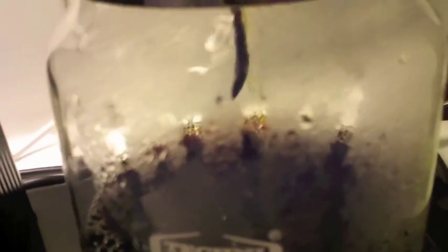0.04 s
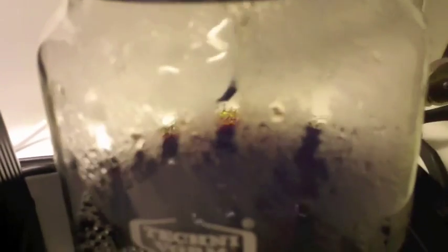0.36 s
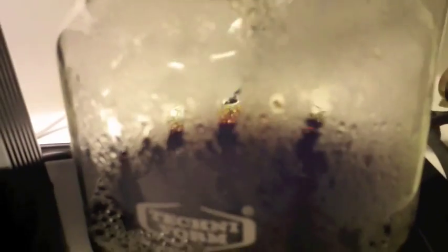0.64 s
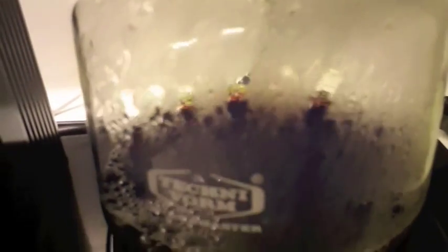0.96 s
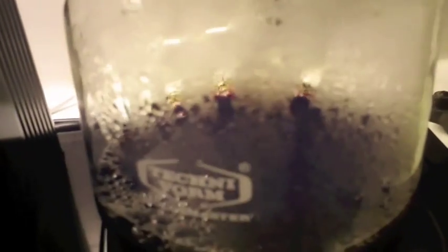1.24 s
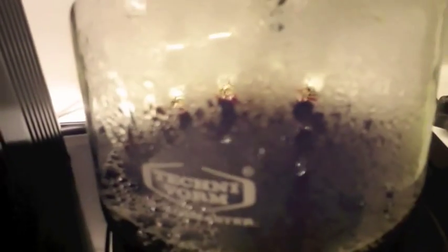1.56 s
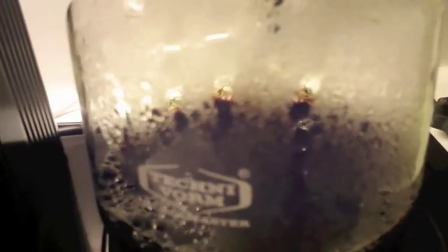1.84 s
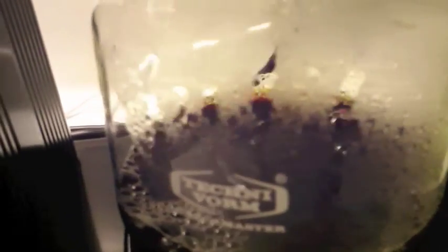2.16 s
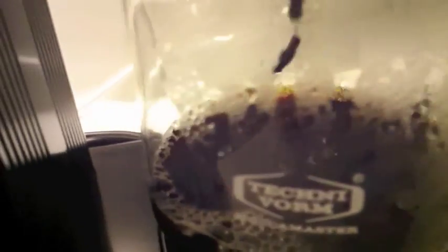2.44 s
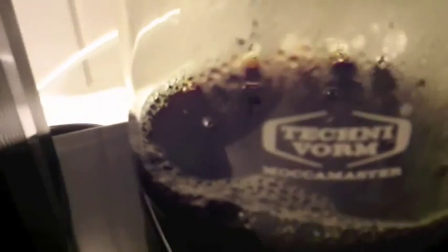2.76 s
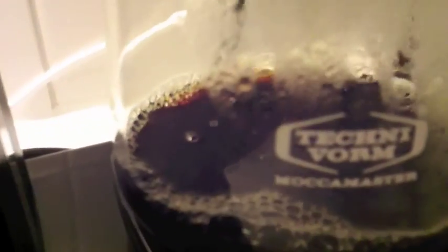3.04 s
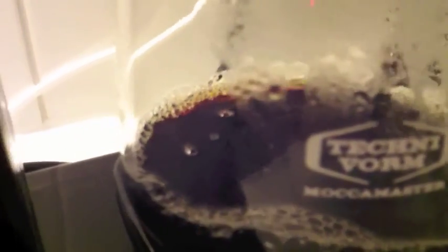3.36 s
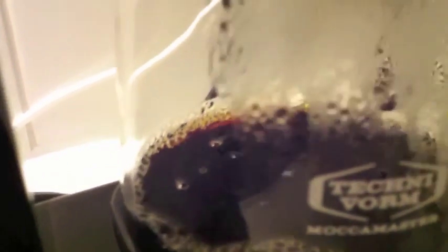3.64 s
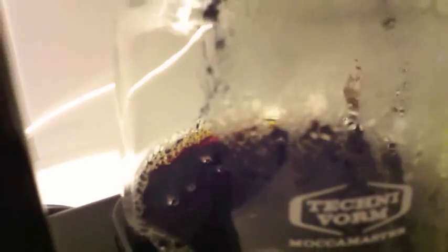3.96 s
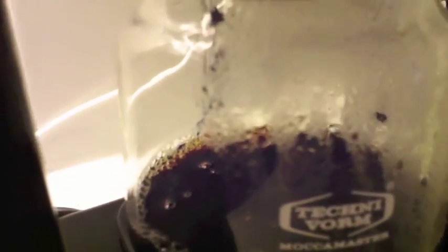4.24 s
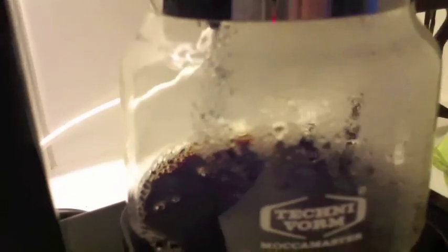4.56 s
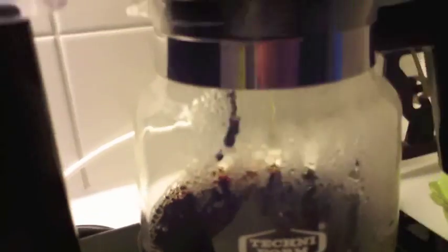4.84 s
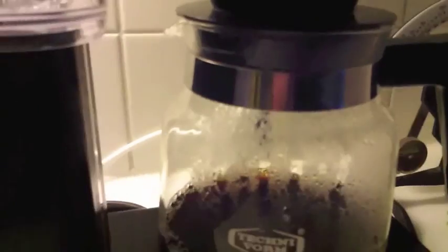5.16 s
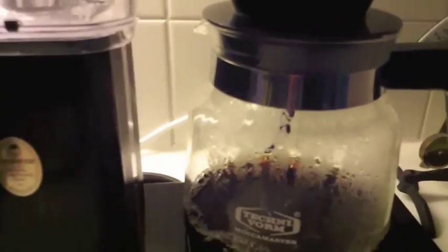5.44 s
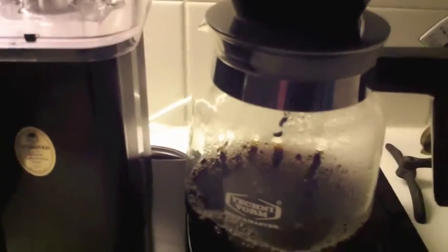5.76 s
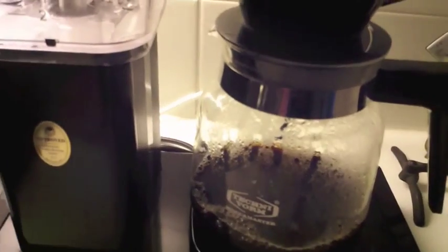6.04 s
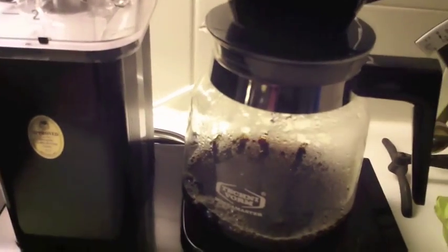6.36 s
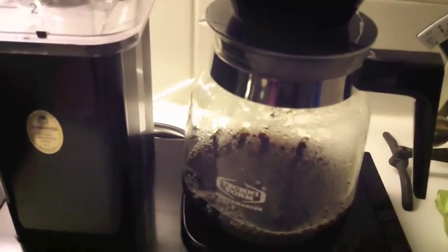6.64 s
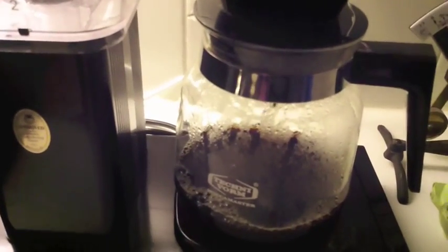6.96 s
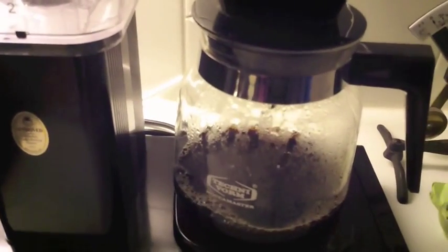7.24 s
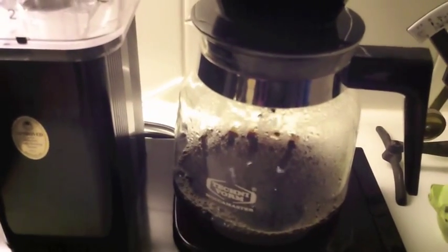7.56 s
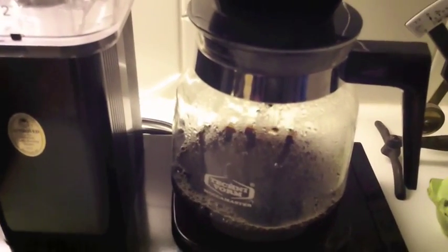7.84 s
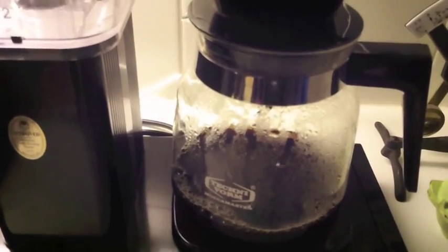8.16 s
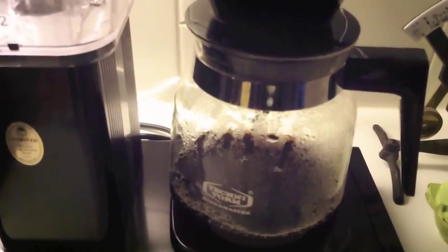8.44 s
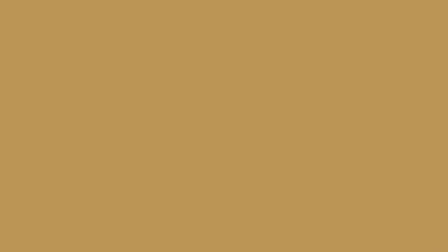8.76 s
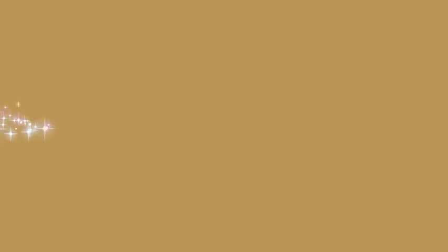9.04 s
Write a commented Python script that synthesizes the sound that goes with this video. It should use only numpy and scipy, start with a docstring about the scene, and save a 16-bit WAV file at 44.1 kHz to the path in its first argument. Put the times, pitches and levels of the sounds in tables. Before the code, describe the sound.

Coffee trickles into a half-full glass carafe in a quiet kitchen, with irregular hollow plinks and small wet ticks on the glass. The loudest drops fall near the middle, and a few low glugs come toward the end. Underneath, the hot plate sizzles faintly with tiny snaps, over soft hiss and mains hum. The close, hand-held microphone picks up low rumble, soft bumps and a few dry clicks.

```python
"""In a kitchen, coffee trickles from a filter into a half-full glass carafe, close to a hand-held mic. Each
drop traps a short-lived bubble that rings the air in the carafe. Spatter ticks on the glass, and later on big
bubbles glug. Wet spots sizzle and snap on the hot plate, over soft air noise, a few steady breathy notes and a
faint mains hum. The hand rumbles and bumps on the microphone, and a few dry clicks sound right beside it."""
import sys
import numpy as np
from scipy import signal
from scipy.fft import rfft, irfft, next_fast_len
from scipy.io import wavfile

SR = 44100
rng = np.random.default_rng(int(sys.argv[2]) if len(sys.argv) > 2 else 0)


def to_wav(sig):
    """Store sig (one row per channel, or 1-D mono) as 16-bit WAV at the path in sys.argv[1].

    Samples outside -1..1 are clipped; the rate is SR.
    """
    pcm = np.clip(np.atleast_2d(sig), -1, 1) * 32767
    pcm = np.round(pcm).astype(np.int16)
    wavfile.write(sys.argv[1], SR, pcm.T)  # frames by channels


N = 410571
TIME = np.arange(N) / SR
END_S = 8.605


def from_db(db):
    """Turn decibels into a number to multiply by."""
    return 10 ** (np.asarray(db) / 20)


def rms_one(x):
    """Scale a sound so that its average strength (rms) is 1."""
    return x / np.sqrt(np.mean(x ** 2) + 1e-20)


def in_time(rows):
    """Join a table's timed points with straight lines: one curve for each value column."""
    times, *columns = np.transpose(rows)
    return [np.interp(TIME, times, column) for column in columns]


def at_hz(points, hz):
    """Look up values between a table's frequencies, with octaves evenly spaced."""
    f, value = np.transpose(points)
    return np.interp(np.log(hz + 1), np.log(f), value)


def pan(left_db):
    """Left and right gains that make the left side louder by left_db."""
    return from_db(np.array([[left_db], [-left_db]]) / 2)


def add(out, s, sound):
    """Mix a sound in, starting at s seconds."""
    i = max(round(s * SR), 0)
    out[:, i:i + sound.shape[-1]] += sound[..., :N - i]


def resonate(x, hz, q):
    """Keep the sound near one pitch; a higher sharpness q rings longer."""
    w = 2 * np.pi * min(hz, SR * .45) / SR
    a = np.sin(w) / (2 * q)
    return signal.lfilter([a, 0, -a], [1 + a, -2 * np.cos(w), 1 - a], x)


def resonate_twice(x, hz, q):
    """Two passes shut out the other pitches more firmly."""
    return resonate(resonate(x, hz, q), hz, q)


def keep_side(x, side, hz):
    """Keep only the "low" or the "high" side of a frequency."""
    return signal.sosfilt(signal.butter(4, hz, side, fs=SR, output="sos"), x)


def coloured(spectrum, shape):
    """Noise with the balance of bass and treble that a table gives."""
    size = next_fast_len(shape[-1])
    gain = from_db(at_hz(spectrum, np.arange(size // 2 + 1) * SR / size))
    white = rfft(rng.standard_normal(shape), size)
    return rms_one(irfft(white * gain, size)[..., :shape[-1]])


def drift(per_s):
    """A slow wobble that heads for a new random value per_s times a second."""
    return np.interp(TIME * per_s, np.arange(400), rng.standard_normal(400))


# tone of the kitchen air: f/Hz, level/dB (table levels are relative; the code sets the final loudness)
AIR_TONE = [(35, -29), (60, 3.5), (210, -4.5), (327, -11.5), (486, -12), (546, -14), (1170, -17),
            (1630, -31), (1740, -25), (2710, -24), (3670, -25.5), (4030, -26.5), (8870, -24.5),
            (14100, -27.5), (15500, -32)]
# how alike left and right are: f/Hz, likeness (1 the same, -1 opposite)
AIR_LIKENESS = [(60, -1.1), (200, -0.17), (500, 0.068), (1200, 0.56), (4000, 0.44), (15000, 0.054)]
def kitchen_air():
    """The room's steady hush, partly shared by the two sides."""
    size = next_fast_len(N)
    alike = np.clip(at_hz(AIR_LIKENESS, np.arange(size // 2 + 1) * SR / size), -1, 1)
    mid, side = rfft(coloured(AIR_TONE, (2, N)), size)
    spectrum = np.sqrt(1 + alike) * mid + np.sqrt(1 - alike) * side * [[1], [-1]]
    return from_db(-58.49) * irfft(spectrum, size)[:, :N]


# notes that ring steadily, the two lowest from the air in the carafe: f/Hz, width/Hz, level/dB
STEADY_NOTES = [(246, 15, -85.5), (491.2, 6.7, -71), (778, 20, -70.5), (1840, 21.5, -82.5), (3100, 41, -76),
                (3738, 68, -69.5), (4530, 33, -82)]
def steady_notes():
    """A few breathy notes keep softly ringing; the two lowest are the air in the carafe humming."""
    white = rng.standard_normal(N) + 0.66 * rng.standard_normal((2, N))
    notes = sum(from_db(db) * rms_one(resonate(white, hz, hz / width)) for hz, width, db in STEADY_NOTES)
    return from_db(-2.5) * notes


# tones of the mains power: f/Hz, level/dB
HUM_TONES = [(100, -66.5), (200, -72.5)]
def mains_hum():
    """The electricity supply hums with two low, pure tones."""
    return sum(from_db(db) * np.sqrt(2) * np.sin(2 * np.pi * hz * TIME) for hz, db in HUM_TONES)


def spits(per_s, jitter, scatter_db):
    """A wet spot spits steam in tiny ticks; more jitter makes their timing less even."""
    unrest = jitter * np.repeat(rng.standard_normal(N // 400 + 1), 400)[:N] + .012 * drift(5)
    spits_so_far = np.cumsum(per_s * np.exp(unrest)) / SR
    ticks = np.diff(np.floor(spits_so_far), prepend=0)
    sizes = from_db(scatter_db * rng.standard_normal(4000))
    ticks[ticks > 0] = sizes[:np.count_nonzero(ticks)]
    return ticks


# course of the sizzle on the hot plate: t/s, level/dB, f/Hz
SIZZLE_COURSE = [(0, -63.5, 7840), (1.2, -60.5, 8400), (2.3, -61, 7940), (3.2, -60.5, 7800),
                 (3.9, -62.5, 7500), (4.6, -63, 7600), (5.5, -66.5, 8000), (6.3, -66, 8700),
                 (7.3, -66.5, 9100), (8.6, -67, 9200)]
# notes of the gap between carafe and plate: f/Hz, width/Hz, level/dB
GAP_NOTES = [(6590, 300, 8), (8850, 200, -4), (9570, 67, -5.5), (10600, 230, -2.5)]
def sizzle():
    """Wet spots under the carafe spit; each bright tick rings in the gap above the plate."""
    level_db, pitch = in_time(SIZZLE_COURSE)
    drying = np.interp(TIME, [3.6, 5.0], [1, .25])
    second_spot = from_db(-4.5) * spits(per_s=93, jitter=0.047, scatter_db=1.5)
    strays = from_db(-11) * spits(per_s=90, jitter=0.76, scatter_db=7.8)
    small_spots = drying * (second_spot + strays)
    all_spots = spits(per_s=84.5, jitter=0.011, scatter_db=0.9) + small_spots
    fall = from_db(-60 / (.027 * SR))   # each tick's hiss fades by 60 dB in 27 ms
    hiss = signal.lfilter([1], [1, -fall], all_spots) * rng.standard_normal((2, N))
    ticks = all_spots + from_db(-25.5) * hiss
    bands_hz = np.geomspace(7400, 9200, 3)   # blending these bands moves the pitch
    place = np.interp(pitch, bands_hz, np.arange(3))
    body = sum(np.maximum(1 - abs(place - k), 0) * resonate_twice(ticks, hz, q=1.63)
               for k, hz in enumerate(bands_hz))
    ring = sum(from_db(db) * resonate(ticks, hz, hz / width) for hz, width, db in GAP_NOTES)
    # the smallest spots burst most sharply and crackle at the very top
    bursts = small_spots * from_db(2.1 * rng.standard_normal((2, N))) + 1e-18
    crackle = resonate_twice(bursts, hz=12700, q=1.0)
    frying = from_db(level_db) * (rms_one(body) + from_db(-10.5) * rms_one(crackle))
    return pan(-0.35) * (frying + from_db(-77.5) * rms_one(ring))


# echoes off the counter and the brewer: delay before stretching/s, level/dB
NEAR_ECHOES = [(.0009, -15), (.0016, -8), (.0029, -15.5)]
# how the echo paths stretch as the microphone moves: t/s, factor
ECHO_STRETCH = [(0, 1.0), (2.3, 1.0), (3, 1.12), (4.3, 0.92), (5.5, 0.9), (8.6, 1.0)]
def counter_echoes(sound, right_stretch):
    """Quick echoes colour the sizzle, and the colour shifts as the microphone moves."""
    stretch, = in_time(ECHO_STRETCH)
    echoes = [sum(from_db(db) * np.interp(TIME - delay * stretch * side, TIME, channel)
                  for delay, db in NEAR_ECHOES)
              for channel, side in zip(sound, (1, right_stretch))]
    return sound + np.array(echoes)


# restlessness of the hand: t/s, level/dB
HAND_COURSE = [(0, -45), (1.1, -49), (1.5, -45.5), (1.9, -49.5), (2.4, -45), (2.8, -41.5), (3.5, -40.5),
               (4.0, -42), (4.38, -38), (4.8, -42.5), (5.5, -38), (6.0, -44.5), (6.7, -45), (7.3, -48.5),
               (7.9, -49.5), (8.5, -46)]
# tone of its rumble: f/Hz, level/dB
RUMBLE_TONE = [(15, 2), (30, 2.5), (48, -2.5), (70, -8), (110, -14), (200, -28), (400, -29), (1000, -56.5)]
# finger bumps: t/s, level/dB
FINGER_BUMPS = [(0.628, -45), (1.396, -44), (1.566, -43.5), (2.646, -41.5), (2.787, -41.5), (2.867, -43.5),
                (3.005, -37.5), (3.337, -36.5), (3.358, -44), (3.705, -39.5), (3.72, -47), (3.765, -41.5),
                (4.339, -45), (4.592, -46), (5.174, -44), (5.422, -45), (5.518, -43), (5.833, -42.5),
                (6.185, -41.5), (6.218, -38.5), (6.24, -51), (6.408, -40), (6.625, -39), (7.509, -52),
                (8.012, -47), (8.257, -42.5), (8.562, -42)]
def hand_on_microphone():
    """The hand shakes the case, pushing left and right opposite ways; bumps knock and swell the rumble."""
    level_db, = in_time(HAND_COURSE)
    shared, *own = coloured(RUMBLE_TONE, (3, N))
    sides = np.array([[1], [-0.37]])
    t, shake_peak_s = TIME[:SR // 4], 0.013
    knock = resonate(t * np.exp(-t / 0.001), hz=85, q=2.0)
    shake = t / shake_peak_s * np.exp(1 - t / shake_peak_s)
    knocks, shaking = np.zeros((2, N)), np.zeros((1, N))
    for s, db in FINGER_BUMPS:
        add(knocks, s, from_db(db + 11.5) * sides * knock / abs(knock).max())
        add(shaking, s, from_db(db + 8) * shake)
    unrest = from_db(level_db + 1.5 + 1.5 * drift(9))
    rumble = sides * shared + 0.28 * np.array(own)
    return knocks + np.hypot(unrest, shaking) * rumble


# the carafe's own notes (air below 2300 Hz, glass above): f/Hz, level/dB, time to fade by 60 dB/s
CARAFE_NOTES = [(493, -11, .18), (660, -6, .07), (785, -10, .13), (900, -9, .07), (990, -3, .07),
                (1057, 2.5, .1), (1105, -5, .07), (1165, 1, .14), (1236, -6, .09), (1314, 1, .12),
                (1358, -3, .09), (1400, -4, .08), (1467, -2, .1), (1505, -5, .07), (1731, 1.5, .18),
                (1770, -3, .09), (1810, -6, .07), (1863, -4, .09), (1935, -8, .07), (2035, -5, .07),
                (2089, -4, .1), (2205, -9, .08), (2820, -4, .08), (2925, -10, .1), (3054, -4, .16),
                (3110, -13, .2), (3618, -11, .14), (3770, -7, .15), (3980, -18, .05), (4443, -2, .12),
                (4578, -3, .07), (4835, -2, .09), (4878, -2, .11), (5060, -11, .06), (5760, -11, .05),
                (6268, -7, .07), (6850, -8, .07), (7585, -7, .06), (10950, -2, .05), (12780, 5, .05),
                (13800, 7, .05)]
# notes that swell or fade as the microphone moves through their loud and quiet spots:
# f/Hz, from t/s, to t/s, extra level/dB
NOTE_SWELLS = [(1165, 2.6, 4.8, 3.5), (1467, 2.6, 4.8, -3), (3054, 5, 8.6, -6), (3110, 5, 8.6, 6),
               (4443, 5, 8.6, -6)]
# tone of the crowded echoes inside the carafe: f/Hz, level/dB
ECHO_TONE = [(400, 8.5), (700, 13), (870, -0.5), (1100, 9), (1450, -8), (1620, -5.5), (1900, 0),
             (2500, -13), (3000, -17.5), (3500, -24.5), (4100, -16), (4900, -19.5), (5500, -9),
             (6000, -17.5), (8000, -14.5), (11000, -7.5), (13500, 4), (15500, -15.5)]
def in_carafe(drops, direct_db, notes_db, echo_db, echo_fade_s, room_db, room_fade_s,
              impact_db, scatter_db, build_s, spread=1.0):
    """Each drop is an impact and a short bubble ring; the carafe's answer builds up, then dies away."""
    t = TIME[:SR // 8]
    hz, note_db, fade_s = CARAFE_NOTES_COLUMNS = np.transpose(CARAFE_NOTES)
    notes = from_db(note_db[:, None] - 60 * t / fade_s[:, None]) * np.exp(2j * np.pi * hz[:, None] * t)
    # where a drop lands decides how strongly each note answers, and its timing on each side
    chance = rng.standard_normal((len(drops), 3, len(hz)))
    strength = from_db(scatter_db * chance[:, :1]) * np.exp(1j * spread * chance[:, 1:])
    when = np.array(drops)[:, 0]
    for note_hz, start, end, db in NOTE_SWELLS:
        strength[(when > start) & (when < end), :, np.argmin(abs(hz - note_hz))] *= from_db(db)
    rings = (strength.reshape(-1, len(hz)) @ notes).real.reshape(len(drops), 2, -1)
    noise = coloured(ECHO_TONE, (len(drops), 3, len(t)))
    echo = (noise[:, :1] + spread * noise[:, 1:]) * from_db(echo_db - 60 * t / echo_fade_s)
    room = noise[:, 1:] * from_db(room_db - 60 * t / room_fade_s)
    answers = from_db(notes_db) * rings * (1 - np.exp(-t / (.06 * build_s)))
    answers += (echo + room) * (1 - np.exp(-t / build_s))   # echoes build more slowly than notes
    answers[:, :, 0] += from_db(direct_db)
    # whatever the bubble's pitch, the impact gives the air the same broad push
    impacts = from_db(impact_db) * resonate_twice(answers, hz=1380, q=0.48)
    out = np.zeros((2, N))
    for (s, db, pitch, q), answer, impact in zip(drops, answers, impacts):
        drop = resonate_twice(answer, pitch, q) + impact
        opening_rms = np.sqrt(np.mean(drop[:, :SR // 50] ** 2))   # first 20 ms
        add(out, s, from_db(db) * drop / opening_rms)
    return out


# flow of small drops, higher in pitch as the filter empties: t/s, level/dB, f/Hz
TRICKLE_COURSE = [(0, -54, 1320), (1.0, -65.5, 1260), (2.1, -61, 1450), (3.2, -59.5, 1220),
                  (4.5, -58.5, 1210), (6.0, -62.5, 1680), (7.4, -61, 1575), (8.6, -70, 1537)]
def small_drops(count, spread_db=4.5, spread_octaves=0.41, q=2.0):
    """One small drop falls at a random moment in each equal time slot: t/s, level/dB, f/Hz, sharpness."""
    when, size, pitch = rng.random((count, 3)).T
    when = (np.arange(count) + when) * END_S / count
    s, db, hz = np.transpose(TRICKLE_COURSE)
    levels = np.interp(when, s, db) + spread_db * (2 * size - 1)
    pitches = np.interp(when, s, hz) * 2 ** (spread_octaves * (2 * pitch - 1))
    return [(*drop, q) for drop in zip(when, levels, pitches)]


def trickle(small):
    """Small soft drops blur into a burble that keeps the air in the carafe ringing."""
    return from_db(-1.5) * in_carafe(
        small, direct_db=2.5, notes_db=-5, echo_db=4, echo_fade_s=.1, room_db=-8.5, room_fade_s=.35,
        impact_db=-5.5, scatter_db=5.5, build_s=.004)


def glass_ring(full, small):
    """Full drops nudge the glass into a soft ring; so does one small drop in five, near the wall."""
    nudges = [(s, -49.5 + 0.4 * db + near_wall_db, 4860, 6)   # t/s, level/dB, f/Hz, sharpness
              for group, near_wall_db in ((full, 0), (small[::5], 10)) for s, db, _, _ in group]
    return pan(1.7) * in_carafe(
        nudges, direct_db=-2, notes_db=6, echo_db=3.5, echo_fade_s=.07, room_db=-19, room_fade_s=.4,
        impact_db=-39.5, scatter_db=3, build_s=.002)


# full drops landing in the coffee: t/s, level/dB, bubble f/Hz, sharpness (low splashes, high plinks)
FULL_DROPS = [(0.043, -48, 1690, 2.9), (0.101, -75.5, 1170, 2), (0.174, -46, 1190, 2),
              (0.251, -40, 1400, 3), (0.293, -48, 1040, 3), (0.328, -59, 1740, 1.6),
              (0.473, -47, 1250, 0.41), (0.577, -45.5, 1290, 2.1), (0.646, -53.5, 1380, 3.4),
              (0.739, -52, 1110, 3.3), (0.781, -53.5, 1430, 4.6), (0.836, -48, 1280, 1.8),
              (0.844, -49.5, 1290, 5.3), (0.872, -54.5, 1300, 1.8), (1.1, -62, 1760, 2.2),
              (1.121, -47, 1340, 2.1), (1.188, -50, 1670, 5.5), (1.277, -55.5, 1280, 1.5),
              (1.379, -49.5, 1330, 2.1), (1.405, -53.5, 1200, 1.1), (1.471, -47.5, 1590, 0.85),
              (1.531, -49, 1770, 2.8), (1.608, -49, 1620, 0.76), (1.652, -51.5, 1240, 1.3),
              (1.746, -44.5, 1050, 2.6), (1.894, -49.5, 1690, 1.3), (2.01, -45, 1670, 1.7),
              (2.049, -43, 1730, 0.98), (2.089, -44.5, 1640, 0.68), (2.123, -49, 1150, 1.1),
              (2.188, -55, 1090, 1.6), (2.41, -57, 1060, 2), (2.604, -52, 1160, 2.3),
              (2.748, -45.5, 1560, 1.1), (2.789, -43, 1200, 0.57), (2.851, -42, 1240, 1.5),
              (2.914, -44, 1250, 1), (2.952, -41, 1620, 1.5), (3.017, -49, 1290, 1.2),
              (3.068, -43.5, 1280, 2.4), (3.193, -50, 1100, 3.4), (3.228, -49, 1224, 8.6),
              (3.262, -51, 1030, 5.5), (3.477, -50, 1250, 0.53), (3.499, -51.5, 1200, 3.2),
              (3.61, -47.5, 1180, 1.8), (3.628, -34.5, 1225, 4.2), (3.651, -57.5, 1210, 1.9),
              (3.687, -58.5, 1180, 2.1), (3.704, -30.5, 1087, 3.8), (3.762, -51.5, 1696, 9.2),
              (3.79, -63, 1750, 4.9), (3.813, -52, 1160, 4.3), (4.113, -34, 1220, 3),
              (4.18, -48, 1210, 4.8), (4.237, -54, 1360, 1.2), (4.272, -54, 1350, 0.47),
              (4.35, -55.5, 1270, 1.1), (4.391, -54, 1560, 0.66), (4.475, -54.5, 1620, 2.1),
              (4.522, -43.5, 1560, 1.6), (4.575, -42, 1290, 1.7), (4.661, -57, 1270, 1.3),
              (4.784, -56.5, 1070, 3.9), (4.842, -53, 1720, 3.9), (4.948, -52.5, 2130, 4.8),
              (5.001, -44, 1260, 2.5), (5.045, -57, 1200, 3.3), (5.208, -42, 1185, 2.7),
              (5.263, -61, 1200, 1), (5.333, -50.5, 1690, 1.4), (5.438, -60, 1780, 3.8),
              (5.461, -44, 1690, 9.1), (5.569, -55, 1770, 3.1), (5.648, -59.5, 1670, 4.3),
              (5.78, -55, 1960, 1.9), (5.861, -60, 1750, 1.4), (5.889, -52.5, 1400, 1.6),
              (6.076, -72, 1700, 1.1), (6.094, -56.5, 1960, 4.2), (6.119, -52.5, 1750, 8.9),
              (6.254, -62, 1750, 2), (6.347, -52, 1060, 1.8), (6.482, -49.5, 1380, 2.4),
              (6.594, -50.5, 1340, 2.2), (6.634, -57, 1120, 2.5), (6.683, -56, 1500, 2.3),
              (6.837, -51.5, 1360, 2.8), (6.952, -52, 1320, 2.8), (7.022, -54.5, 1710, 1.8),
              (7.153, -51.5, 1550, 1), (7.305, -46, 2100, 2.2), (7.406, -42, 1380, 2.2),
              (7.496, -57, 1410, 0.55), (7.621, -58, 1620, 1.3), (7.652, -54, 1550, 1.5),
              (7.711, -58, 1700, 4.5), (7.774, -61, 1730, 2.5), (7.928, -57, 1580, 2),
              (7.987, -55.5, 1950, 3), (8.041, -45.5, 1320, 2), (8.122, -53, 1720, 1.2),
              (8.202, -52, 1700, 1.4), (8.278, -69, 1730, 3), (8.401, -54, 1340, 2.5),
              (8.482, -57.5, 2020, 3.3)]
def drips():
    """Full drops land softly in mid-pool, so all ring much the same hollow notes with little treble."""
    sound = in_carafe(
        FULL_DROPS, direct_db=18, notes_db=-5, echo_db=12, echo_fade_s=.045, room_db=-0.5,
        room_fade_s=.32, impact_db=-19, scatter_db=2, build_s=.0018, spread=.33)
    mellow = keep_side(sound, "low", hz=2700)
    return pan(0.283) * from_db(-1.02) * keep_side(mellow, "high", hz=760)


# spatter hitting the glass: t/s, level/dB, f/Hz, sharpness (low splats, high ticks)
SPATTER_HITS = [(0.107, -57, 5530, 11), (0.156, -46, 5800, 1.4), (0.178, -45, 4500, 1.1),
                (0.254, -56, 4800, 1.7), (0.474, -40.5, 4900, 0.91), (0.899, -57, 3100, 1.6),
                (1.225, -60, 3000, 3.1), (1.733, -50, 5740, 0.76), (1.849, -48, 3700, 0.6),
                (1.852, -48.5, 4830, 6.7), (2.032, -56, 4500, 0.74), (2.123, -57.5, 2950, 3.7),
                (2.247, -55, 4680, 25), (2.336, -57.5, 5440, 0.33), (2.641, -56, 5460, 2.7),
                (2.723, -51, 6200, 2.5), (2.927, -50.5, 5500, 1.3), (3.195, -41.5, 5100, 3),
                (3.361, -60.5, 5300, 1), (3.432, -65, 4900, 8), (3.632, -59, 2820, 16),
                (3.812, -51, 3160, 0.62), (3.912, -59, 4680, 6.4), (4.007, -57, 2760, 4.9),
                (4.18, -44.5, 3870, 0.93), (4.454, -60, 4870, 8), (4.477, -58, 5230, 1.7),
                (4.722, -63.5, 4760, 10), (4.949, -49, 2780, 0.89), (5.266, -53, 4500, 1.1),
                (5.509, -50.5, 3440, 1.3), (5.701, -57.5, 4860, 8), (5.784, -50.5, 4200, 1.2),
                (5.863, -60, 4700, 3), (6.093, -66, 4800, 8), (6.171, -55, 4860, 1.2),
                (6.272, -56, 3020, 0.66), (6.459, -61, 5460, 1.7), (6.494, -68, 4970, 2.2),
                (6.501, -50, 4500, 1.2), (6.587, -50, 5000, 2.6), (6.918, -55.5, 3750, 0.56),
                (7.302, -52.5, 4170, 0.86), (7.371, -53.5, 7900, 0.59), (7.436, -53.5, 5400, 1),
                (7.506, -55.5, 4750, 9.2), (8.027, -60.5, 4740, 9.1), (8.372, -54, 4300, 2.3),
                (8.558, -54.5, 4800, 7.6)]
def spatter():
    """Tiny drops break up on the glass, so each tick has a short, wet body."""
    return pan(2.8) * from_db(0.5) * in_carafe(
        SPATTER_HITS, direct_db=12.5, notes_db=-2, echo_db=15, echo_fade_s=.07, room_db=-13,
        room_fade_s=.4, impact_db=-26, scatter_db=6.5, build_s=.0012)


def dry_bursts(rows, gain_db, fade_s):
    """Outside the carafe, a click is just a burst of noise that dies almost at once."""
    t, out = TIME[:SR // 20], np.zeros((2, N))
    for s, db, hz, q in rows:
        shared, *own = rng.standard_normal((3, len(t))) * from_db(-60 * t / fade_s)
        burst = resonate_twice(shared + 0.17 * np.array(own), hz, q)
        add(out, s, from_db(db + gain_db) * burst / abs(burst).max())
    return out


# the sharpest snaps on the hot plate: t/s, level/dB
PLATE_SNAPS = [(0.239, -44), (0.53, -48), (0.994, -48), (1.279, -45), (1.896, -51), (1.998, -43),
               (2.265, -50), (2.789, -53), (2.902, -51), (4.301, -51), (7.078, -47)]
def snaps(hz=13000, q=1.5):
    """Now and then a wet spot on the hot plate bursts with a tiny sharp snap."""
    return dry_bursts([(s, db, hz, q) for s, db in PLATE_SNAPS], gain_db=-1.5, fade_s=0.028)


# clicks beside the microphone: t/s, level/dB, f/Hz, sharpness
CLOSE_CLICKS = [(2.5748, -32, 8300, 0.87), (2.574, -42, 835, 2.1), (2.5888, -35.5, 760, 1.8),
                (2.5902, -34, 3300, 1.1), (7.514, -43, 780, 1.3), (8.564, -38.5, 900, 0.96)]
def close_clicks():
    """A few dry clicks sound close by, without ringing the carafe."""
    return dry_bursts(CLOSE_CLICKS, gain_db=-4, fade_s=0.029)


# big slow bubbles: t/s, level/dB, f/Hz
BIG_BUBBLES = [(5.141, -64.5, 745), (7.082, -61.5, 664), (7.515, -58.5, 703), (7.543, -54.5, 643),
               (7.718, -64, 650), (8.124, -59.5, 675), (8.231, -53.5, 700), (8.27, -50.5, 670),
               (8.565, -53, 700)]
def glugs(q=5.7):
    """Big bubbles ring low and long, below the carafe's strongest notes."""
    bubbles = [(s, db, hz, q) for s, db, hz in BIG_BUBBLES]
    return pan(9.9) * from_db(1.5) * in_carafe(
        bubbles, direct_db=46, notes_db=7.5, echo_db=2.5, echo_fade_s=.034, room_db=-13,
        room_fade_s=.14, impact_db=-28.5, scatter_db=5.5, build_s=.0015, spread=.99)


def scene():
    """Mix the coffee, the hot plate, the hand, the kitchen and the clicks."""
    small = small_drops(count=150)
    coffee = drips() + trickle(small) + glass_ring(FULL_DROPS, small) + glugs() + spatter()
    sizzling = counter_echoes(sizzle(), right_stretch=0.61)
    plate = from_db(-2.5) * keep_side(sizzling, "high", hz=5900)
    hand = hand_on_microphone()
    kitchen = kitchen_air() + steady_notes() + mains_hum()
    return coffee + plate + hand + kitchen + snaps() + close_clicks()


def record(dry):
    """Fade out quickly at the end and remove the very highest treble."""
    fade_s, cutoff_hz = .02, 15400
    fade = np.clip((END_S - TIME) / fade_s, 0, 1)
    return signal.sosfilt(signal.ellip(10, .2, 70, cutoff_hz, fs=SR, output="sos"), dry * fade)


dry = scene()
out = record(dry)
to_wav(out)
```